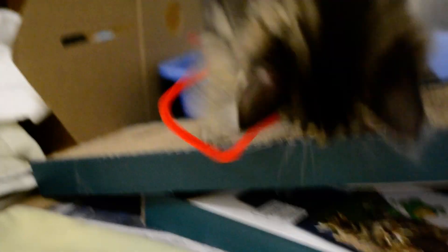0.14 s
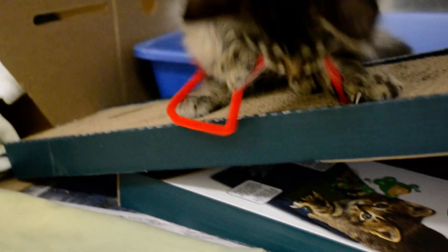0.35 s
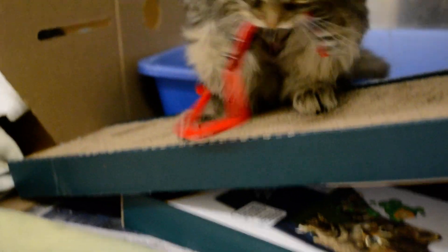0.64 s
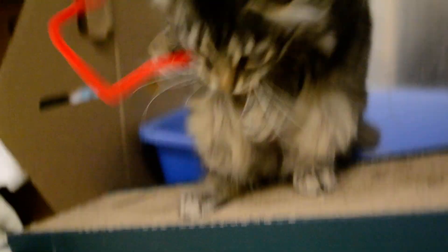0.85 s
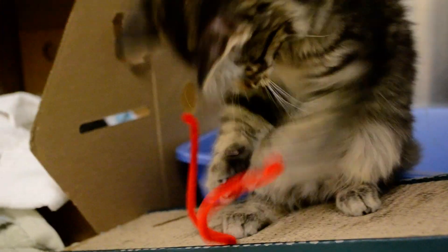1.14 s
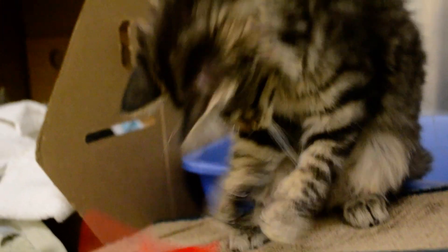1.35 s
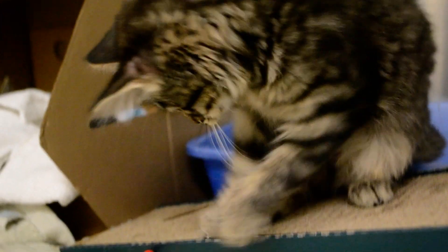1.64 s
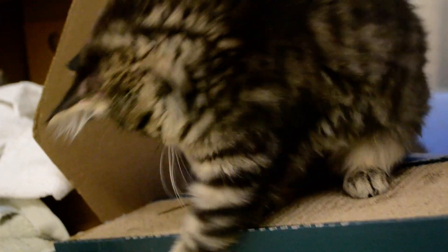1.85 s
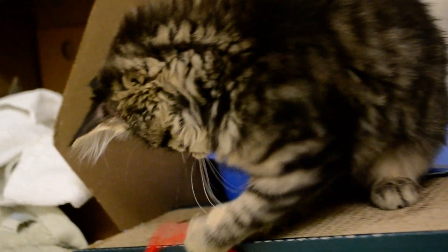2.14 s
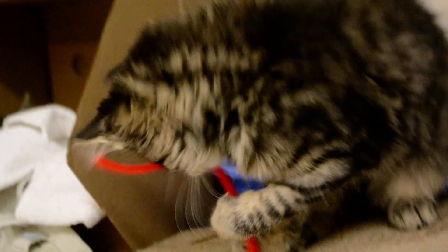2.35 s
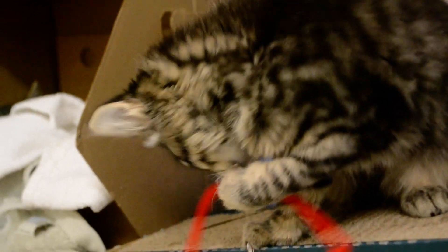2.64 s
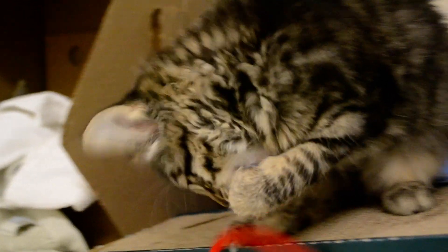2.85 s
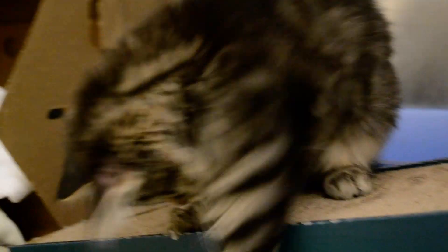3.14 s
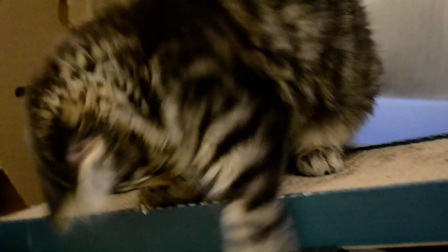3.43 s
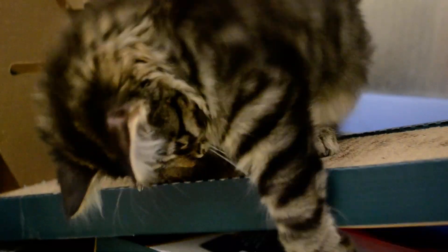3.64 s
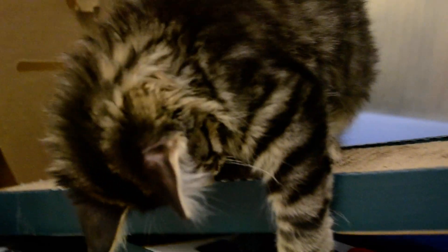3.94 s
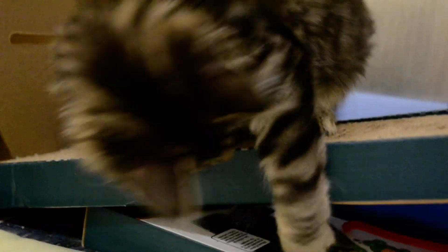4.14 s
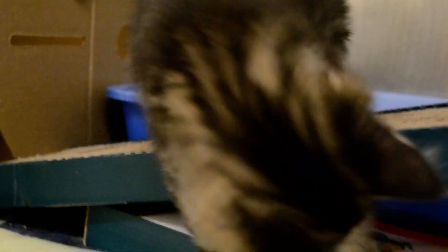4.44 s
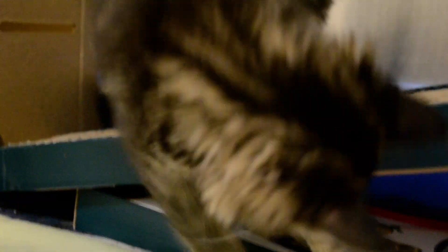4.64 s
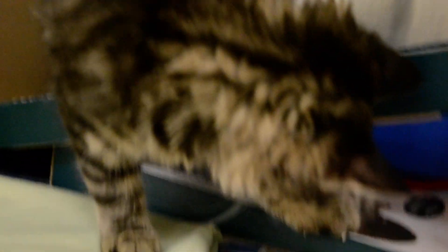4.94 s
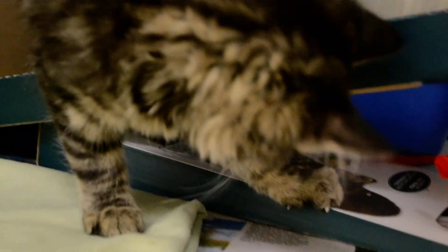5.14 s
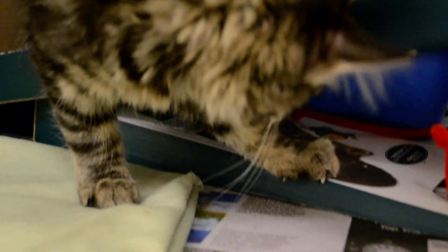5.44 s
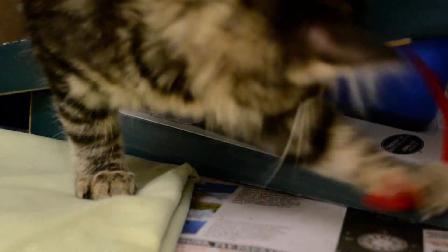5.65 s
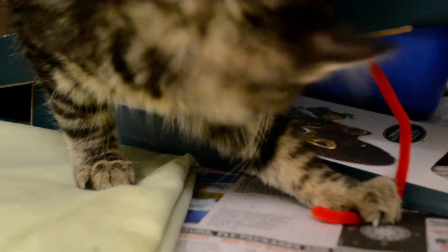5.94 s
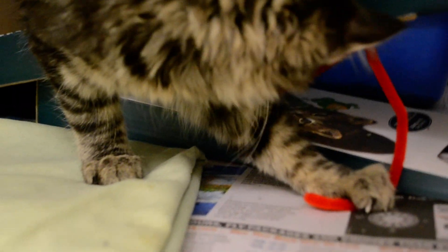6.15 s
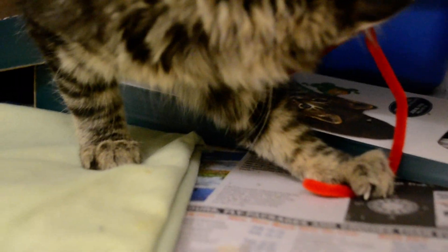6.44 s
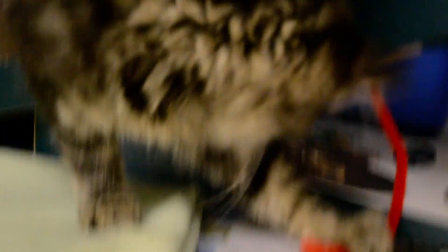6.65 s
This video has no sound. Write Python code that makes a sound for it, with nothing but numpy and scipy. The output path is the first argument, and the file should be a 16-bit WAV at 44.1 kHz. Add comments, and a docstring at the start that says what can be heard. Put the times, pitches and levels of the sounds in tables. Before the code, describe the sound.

A kitten's paws thump hollow cardboard in uneven light taps and a few sharp knocks, with scratchy scuffs, fur rustles and faint purring in a quiet room.

```python
"""Kitten paws and claws knock hollow cardboard: short crunches of clicks ring its damped modes.
Between knocks, grainy friction noise gives hollow rubs, cardboard scuffs, fur and paper swishes and claw scratches.
A faint purr comes and goes: slow pulses excite a throat resonance.
The kitten chases a fuzzy wire toy over a scratcher, box and newspaper in a quiet room with a faint diffuse echo."""
import sys
import numpy as np
from scipy import signal
from scipy.io import wavfile
from scipy.ndimage import uniform_filter1d

SR = 44100
rng = np.random.default_rng(int(sys.argv[2]) if len(sys.argv) > 2 else 0)


def waveform_to_disk(signal):
    """Save audio, clipped to [-1, 1], as 16-bit WAV at the path in sys.argv[1]."""
    frames = np.transpose(np.atleast_2d(signal))
    scaled = np.clip(frames, -1, 1) * 32767
    samples = np.round(scaled).astype(np.int16)
    wavfile.write(sys.argv[1], SR, samples)


N = 299439   # samples, about 6.8 s


def from_db(db):
    """Amplitude gain is ten to the power of a twentieth of the decibels."""
    return 10 ** (np.asarray(db) / 20)


def rms_one(x):
    """Normalisation: divide by the root mean square, so that a gain in dB sets the level."""
    return x / np.sqrt(np.mean(x ** 2) + 1e-20)


def at_hz(points, hz):
    """Logarithmic pitch scale: interpolate a (pitch_hz, value) table along log frequency."""
    table_hz, values = np.transpose(points)
    return np.interp(np.log(hz), np.log(table_hz), values)


def drift(rate_hz):
    """Low-pass filtered noise: a slow random fluctuation of unit rms, computed at every 40th sample."""
    step = 40
    pole = np.exp(-2 * np.pi * rate_hz * step / SR)
    white = rng.standard_normal(N // step + 2002)
    slow = signal.lfilter([1], [1, -2 * pole, pole * pole], white)[2000:]   # drop the filter's start
    return np.interp(np.arange(N) / step, np.arange(len(slow)), rms_one(slow))


def coloured(sources, spectrum, patchy_db, flicker_hz):
    """Third-octave synthesis: each band flickers by itself; neighbours alternate between two sources."""
    edges = 25 * 2 ** (np.arange(28) / 3)
    out = 0
    for k, (low, high) in enumerate(zip(edges, edges[1:])):
        level_db = at_hz(spectrum, np.sqrt(low * high))
        sos = signal.butter(2, [low, high], "band", fs=SR, output="sos")
        band = signal.sosfilt(sos, sources[k % 2])
        out = out + from_db(level_db + patchy_db * drift(flicker_hz)) * band
    return rms_one(out)


def grains(per_s, spread_db, clump_db):
    """Stick-slip of fibres: randomly timed clicks of uneven size, with a clumping level."""
    sizes = from_db(spread_db * np.minimum(rng.exponential(1, N), 5))
    signs = rng.choice([-1, 1], N)
    caught = rng.random(N) < per_s / SR
    return sizes * signs * caught * from_db(clump_db * drift(25.0)) + 1e-18


# still room's relative spectrum: pitch_hz [Hz], level_db [dB per Hz]
AIR_SPECTRUM = [(18, -52), (30, -20), (65, -3.5), (124, -8.5), (189, -1.5), (342, 4.5), (485, -2),
                (721, -5.5), (2440, -29.5), (3120, 2), (3630, -21), (4310, -11.5), (7830, -45), (9560, -55),
                (11400, -41), (14800, -80), (22000, -120)]
AIR_DB = -70.5   # overall rms


def still_air():
    """Stationary noise: white noise shaped in bands makes a nearly steady room tone."""
    white = rng.standard_normal((2, N))
    return from_db(AIR_DB) * coloured(white, AIR_SPECTRUM, patchy_db=.3, flicker_hz=3.0)


# the kitten's movement over time: start_s [s], scuff_db [dB, cardboard], swish_db [dB, fur and paper]
MOVES = [(0.0, -66, -72.5), (0.3, -64.5, -76.5), (0.51, -68.5, -80), (1.02, -69, -78.5), (1.6, -68, -80),
         (1.89, -64.5, -67.5), (2.05, -68, -66.5), (2.22, -67.5, -77.5), (3.0, -66, -80.5),
         (3.54, -66.5, -71.5), (3.72, -61.5, -67), (3.86, -66.5, -67.5), (3.97, -69.5, -81.5),
         (4.76, -63.5, -73), (4.92, -68.5, -81), (5.43, -69, -80.5), (6.49, -66.5, -73.5), (6.79, -69, -77)]
# short brushes of a paw: start_s [s], length_s [s], rub_db [dB, hollow], scratch_db [dB, claws],
# swish_db [dB], scratch_hz [Hz, band centre]
BRUSHES = [(0.0, 0.067, -70, -79, -61.5, 1970), (0.392, 0.083, -75, -63, -67.5, 2000),
           (0.956, 0.034, -67.5, -68.5, -89, 2960), (1.095, 0.063, -64.5, -79, -80, 2800),
           (1.611, .03, -80, -85, -76, 5000), (1.682, 0.09, -59.5, -63.5, -90, 1800),
           (1.838, 0.022, -70, -60, -63, 5200), (1.932, 0.032, -78, -64.5, -74, 3900),
           (2.052, 0.045, -69, -70.5, -76, 2760), (2.162, 0.039, -60.5, -86, -76, 1400),
           (3.012, 0.04, -61.5, -69.5, -69, 1285), (3.284, 0.04, -53, -53, -54.5, 3020),
           (3.323, 0.046, -59, -47, -64, 3350), (3.493, 0.04, -57, -55, -62, 1790),
           (3.565, 0.032, -65, -70, -62.5, 5400), (3.635, 0.027, -61, -73, -66, 3000),
           (3.695, 0.025, -57.5, -59.5, -80, 2130), (4.22, 0.084, -58.5, -63, -62.5, 5560),
           (4.592, 0.054, -63, -65, -75, 4380), (4.647, 0.044, -70, -58.5, -69.5, 1520),
           (4.784, 0.035, -77, -59, -77, 1510), (5.514, 0.032, -67, -63, -59.5, 2300),
           (5.586, 0.058, -71, -60.5, -59, 1300), (5.735, 0.023, -50.5, -53, -55.5, 1180),
           (5.814, 0.03, -62, -74, -76, 1390), (5.943, 0.13, -83, -95, -74, 3000),
           (6.076, 0.19, -74, -70, -78, 2770), (6.458, 0.067, -66, -61, -63.5, 2580),
           (6.656, 0.062, -65.5, -67, -65.5, 2800)]
# relative spectra of rub through the box's air, cardboard scuff, fur and paper swish:
# pitch_hz [Hz], level_db [dB per Hz]
RUB_SPECTRUM = [(350, -26), (550, -9.5), (760, -5.5), (1050, -7), (1600, -8), (2500, -38)]
SCUFF_SPECTRUM = [(120, -13), (200, 0), (573, -3), (795, 2.5), (879, -4), (1180, -0.5), (1670, -6),
                  (2350, -9.5), (6000, -24), (7800, -40), (13200, -120)]
SWISH_SPECTRUM = [(1000, -24), (2000, 5), (3000, 0), (4200, 0), (5500, -2.5), (7000, 0.5), (8000, -10),
                  (9300, -1), (10500, -10), (11200, -25), (12000, -46)]
# a knock leaves things shifting; rows are rub, scuff, swish: level_db [dB relative to the knock's clack]
SETTLE_DB = [
    [-32.5],
    [-36],
    [-35],
]
SETTLE_T60_S = 0.43   # time for that shifting to fall by 60 dB


def rustle():
    """Friction noise: cardboard drags grainily and hollowly, fur and paper swish finely, claws scratch in a band."""
    start_s, scuff_db, swish_db = np.transpose(MOVES)
    t = np.arange(N) / SR
    scuff_gain = from_db(np.interp(t, start_s, scuff_db))
    swish_gain = from_db(np.interp(t, start_s, swish_db))
    gains = np.array([0 * t, scuff_gain, swish_gain])   # rows: rub, scuff, swish
    for start, _, clack_db, *_ in KNOCKS:
        first = round(start * SR)
        after = slice(first, first + SR // 2)
        dying_db = clack_db - 60 * (t[after] - start) / SETTLE_T60_S
        gains[:, after] += from_db(dying_db + SETTLE_DB)

    claws, scratch = grains(3000.0, 1.3, 4.3), np.zeros(N)
    for start, length, rub_db, scratch_db, brush_db, hz in BRUSHES:
        span = slice(round(start * SR), round((start + length) * SR))
        swell = np.sin(np.pi * np.clip((t[span] - start) / length, 0, 1)) ** 0.84
        gains[::2, span] += from_db([[rub_db], [brush_db]]) * swell   # rub and swish rows
        sos = signal.butter(2, [hz / 1.3, hz * 1.3], "band", fs=SR, output="sos")
        clawing = rms_one(signal.sosfilt(sos, claws[span]))
        scratch[span] += from_db(scratch_db) * swell * clawing

    rub_grains = [grains(800.0, 1.9, 0.74) for _ in range(2)]
    rub = coloured(rub_grains, RUB_SPECTRUM, patchy_db=2.5, flicker_hz=37.0)
    scuff_grains = [grains(2500.0, 1.97, 0.9) for _ in range(2)]
    scuff = coloured(scuff_grains, SCUFF_SPECTRUM, patchy_db=3.0, flicker_hz=16.0)
    swish_grains = [grains(4000.0, 1.94, 2.25) for _ in range(2)]
    swish = coloured(swish_grains, SWISH_SPECTRUM, patchy_db=1.5, flicker_hz=35.0)
    return gains[0] * rub + gains[1] * scuff + gains[2] * swish + scratch


# purr phrases: start_s [s, first pulse], end_s [s], rate_hz [pulses per s],
# level_db [dB, typical peak of a pulse]
PURR = [(0.008, 0.33, 29.4, -55), (0.464, 0.51, 29.5, -56), (2.531, 2.77, 27.0, -59),
        (2.968, 3.02, 27.0, -59), (5.440, 5.56, 27.0, -61), (6.447, 6.68, 26.6, -58)]
THROAT_HZ, THROAT_T60_S = 726, 0.022


def purr():
    """Source and filter: slow, nearly even larynx pulses each excite a short throat resonance."""
    pulses = np.zeros(N)
    for start, end, rate_hz, level_db in PURR:
        times = np.arange(start, end, 1 / rate_hz)
        uneven = rng.standard_normal((12, 2))[:len(times)]
        at = ((times + .0007 * uneven[:, 0]) * SR).astype(int)
        pulses[at] = from_db(level_db + 2 * uneven[:, 1])
    t = np.arange(2048) / SR
    onset = np.clip(t / 0.0018, 0, 1)
    ring = from_db(-60 * t / THROAT_T60_S) * np.sin(2 * np.pi * THROAT_HZ * t) * onset
    return signal.fftconvolve(pulses, ring / ring.max())[:N]


# knocks on cardboard, a heavy landing being several touches: start_s [s], thud_db [dB, low modes],
# clack_db [dB, high modes and fibres], crack_db [dB, fibres above 5 kHz], crunch_s [s, decay to 1/e],
# thud_hz [Hz, favoured pitch], clack_hz [Hz, favoured pitch]
KNOCKS = [(0.866, -47, -45, -75, 0.0022, 1250, 1500), (0.881, -81, -66, -65, .002, 681, 3500),
          (0.954, -74, -70, -59.5, .002, 982, 2220), (0.963, -68, -55, -63, .003, 1130, 3300),
          (1.058, -55, -55, -65, .002, 1030, 3220), (1.17, -61, -51.5, -55, 0.0055, 1270, 2070),
          (1.692, -53.5, -45, -53, 0.0062, 1180, 2400), (1.737, -50.5, -58, -80, .006, 729, 1330),
          (1.789, -59.5, -58.5, -61, .01, 686, 1810), (1.82, -59, -51.5, -60, .008, 730, 1450),
          (1.882, -58, -56, -64, .0025, 1220, 1330), (2.348, -64, -55, -73, 0.0045, 401, 1400),
          (2.394, -51.5, -59, -80, .002, 1110, 1420), (2.463, -52.5, -51.5, -65, .005, 900, 2740),
          (3.055, -43, -31.5, -54, 0.0073, 1130, 1556), (3.066, -46, -31, -56, .002, 1180, 3240),
          (3.07, -47, -32, -46, 0.0033, 818, 3370), (3.075, -59, -31.5, -62, 0.0032, 1300, 1520),
          (3.226, -17.5, -22.5, -52, 0.0046, 814, 3150), (3.231, -31, -22, -49, 0.0042, 700, 1640),
          (3.236, -33, -30.5, -49, 0.0046, 815, 3020), (3.491, -56, -41, -57, 0.0022, 1230, 3560),
          (3.504, -62, -41, -51, .004, 920, 1460), (3.511, -49, -45, -55, 0.0053, 820, 1330),
          (3.668, -55, -53, -50, .005, 732, 1890), (3.697, -50.5, -57, -58, .005, 805, 1820),
          (3.719, -74, -57, -50.5, .003, 1150, 2390), (3.748, -56, -57, -50, .005, 1180, 2320),
          (3.763, -52, -54, -63, .003, 420, 1310), (3.827, -68, -65, -57, .002, 800, 4000),
          (3.838, -70, -64, -55.5, .002, 800, 4000), (3.88, -70, -50, -59, .002, 900, 3000),
          (3.96, -40, -47.5, -75, 0.0019, 1190, 1390), (4.005, -53, -55, -78, .002, 1000, 1500),
          (4.248, -41.5, -41, -58, .007, 1210, 2710), (4.256, -40.5, -35.5, -46.5, 0.0049, 1200, 2920),
          (4.403, -49.5, -57.5, -74, .007, 560, 4000), (4.448, -46, -27, -57, 0.0073, 1150, 2650),
          (4.457, -42.5, -27.5, -55, 0.0075, 1190, 2280), (4.809, -57.5, -64, -81, .003, 786, 1554),
          (5.072, -66, -68, -71, .003, 640, 1590), (5.302, -72, -71, -67, .002, 545, 1310),
          (5.645, -34, -28.5, -43, 0.011, 1240, 3300), (5.65, -25.5, -22, -36, 0.0042, 1090, 2850),
          (5.655, -28.5, -25, -47, .003, 990, 1480), (5.66, -27, -30, -56, 0.0026, 450, 2200),
          (6.251, -61, -56.5, -73, .0015, 738, 2600), (6.275, -50, -64, -75, 0.0032, 443, 1430),
          (6.296, -52, -54.5, -62, .002, 615, 1550), (6.597, -56, -63, -82, .003, 743, 2180),
          (6.627, -40, -38.5, -46.5, 0.0022, 1250, 1990)]
# modes of the hollow cardboard: pitch_hz [Hz, average over knocks], level_db [dB],
# t60_s [s, before the paw's damping factor]
BOARD = [(340, -10, .07), (420, -7, .07), (515, 0, .08), (640, -16, .05), (778, 0, .07), (960, -12, .05),
         (1110, -3, .06), (1230, -6, .05), (1480, -3, .045), (1620, -7, .05), (1850, -5, .05),
         (2240, -7, .05), (2540, -6, .045), (2850, -6, .045), (3200, -4, .05), (3420, -8, .04),
         (3660, -7, .05), (3990, -6, .03), (4390, -10, .04), (4660, -11, .05)]
RING_SHARE = 0.29   # factor on t60 under a paw whose thud is at -55 dB, a light touch
RING_DOUBLING_DB = 49   # a thud this much louder throws the paw off and rings twice as long


def knocks():
    """Modal excitation: paws crush the flutes in a crunch of clicks, ringing modes favoured by the spot."""
    size = 4096
    t, out = np.arange(size) / SR, np.zeros(N + size)
    mean_hz, mode_db, t60_s = np.transpose(BOARD)[:, :, None]
    low = mean_hz < 1300
    is_low = low[:, 0]
    treble = signal.butter(2, [5000, 10000], "band", fs=SR, output="sos")
    for start, thud_db, clack_db, crack_db, crunch_s, thud_hz, clack_hz in KNOCKS:
        fading = np.exp(-t / crunch_s)
        crunch = fading * rng.standard_normal(size) * (rng.random(size) < .06) * 0.67
        crunch[0] = 1

        # each knock shifts the board's mode pitches slightly at random
        hz = mean_hz * (1 + 0.013 * rng.standard_normal(mean_hz.shape))
        spot_hz = np.where(low, thud_hz, clack_hz)
        favoured_db = -11 * np.log2(hz / spot_hz) ** 2
        chance_db = 2 * rng.standard_normal(hz.shape)
        signs = rng.choice([-1, 1], hz.shape)
        strength = from_db(mode_db + favoured_db + chance_db) * signs
        share = RING_SHARE * 2 ** ((thud_db + 55) / RING_DOUBLING_DB)
        rings = strength * from_db(-60 * t / (t60_s * share)) * np.sin(2 * np.pi * hz * t)

        push = 0.6 * crunch   # the slow modes feel mostly the first push
        push[0] = 1
        thud = signal.fftconvolve(rings[is_low].sum(0), push)[:size]
        clack = signal.fftconvolve(rings[~is_low].sum(0), crunch)[:size]

        # snapping fibres sound directly, unpitched
        fibres = 5.3 * crunch + rng.standard_normal(size) * fading ** 0.8
        middle = signal.butter(2, [clack_hz / 1.7, clack_hz * 1.6], "band", fs=SR, output="sos")
        clack = rms_one(clack) + 2.2 * rms_one(signal.sosfilt(middle, fibres))
        crack = signal.sosfilt(treble, fibres)

        at = round(start * SR)
        for part, level_db in (thud, thud_db), (clack, clack_db), (crack, crack_db):
            loudest = np.sqrt(uniform_filter1d(part ** 2, size=128).max())   # rms over about 3 ms
            out[at:at + size] += from_db(level_db) * part / loudest
    small = signal.butter(2, 420, "high", fs=SR, output="sos")   # a small panel radiates little bass
    return signal.sosfilt(small, out[:N])


# the room's decay: pitch_hz [Hz], t60_s [s]
ECHO = [(300, 0.61), (800, 0.15), (2000, 0.38), (5500, 0.41), (10000, 0.24)]
ECHO_DB = -12.5   # gain of the unit-energy tail


def room(x):
    """Diffuse reverberation: octave bands of noise decay at their own rates after a 9 ms fade-in."""
    t = np.arange(SR // 2) / SR
    tail = 0
    for hz in 250 * 2. ** np.arange(7):
        edges = [hz / np.sqrt(2), min(hz * np.sqrt(2), 20000)]
        sos = signal.butter(2, edges, "band", fs=SR, output="sos")
        band = signal.sosfilt(sos, rng.standard_normal(len(t)))
        tail = tail + band * from_db(-60 * t / at_hz(ECHO, hz))
    tail = tail * np.clip(t / 0.009, 0, 1)
    unit_tail = tail / np.sqrt(np.sum(tail ** 2))
    return from_db(ECHO_DB) * signal.fftconvolve(x, unit_tail)[:N]


def scene():
    """Superposition: the kitten's direct sound, its echo and the still air add."""
    near = knocks() + purr() + rustle()
    return (near + room(near) + still_air())[None]


# microphone housing resonances: pitch_hz [Hz], width_hz [Hz], level_db [dB, gain at the centre]
PORT = [(3040, 560, 3), (4210, 330, 2), (5470, 120, 4), (7840, 1080, -5), (9040, 190, 1), (11940, 1000, -2)]
CUTOFF_HZ = 11800   # stopband edge, where the low-pass reaches 55 dB of loss


def record(dry):
    """Linear filtering: the housing colours the treble, deep bass and top are cut; converter hiss is added."""
    for hz, width_hz, level_db in PORT:
        peak = signal.lfilter(*signal.iirpeak(hz, hz / width_hz, fs=SR), dry)
        dry = dry + (from_db(level_db) - 1) * peak
    dry = signal.sosfilt(signal.butter(2, 40, "high", fs=SR, output="sos"), dry)
    cut = signal.sosfilt(signal.cheby2(12, 55, CUTOFF_HZ, fs=SR, output="sos"), dry)
    return cut + from_db(-104) * rng.standard_normal(dry.shape)


dry = scene()
out = record(dry)
waveform_to_disk(out)
```